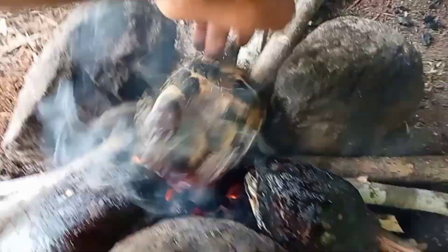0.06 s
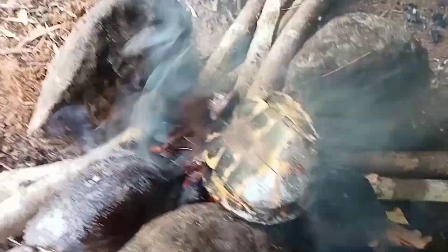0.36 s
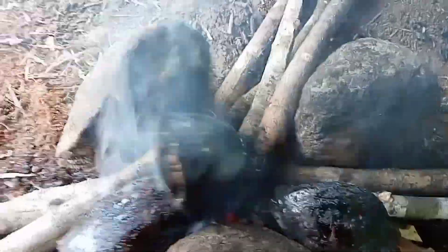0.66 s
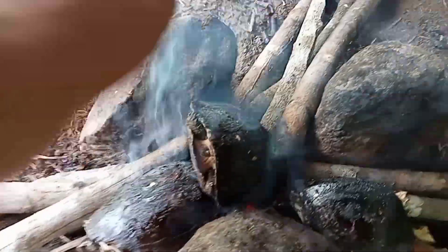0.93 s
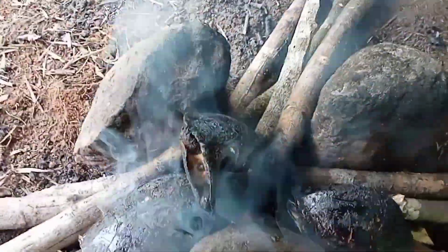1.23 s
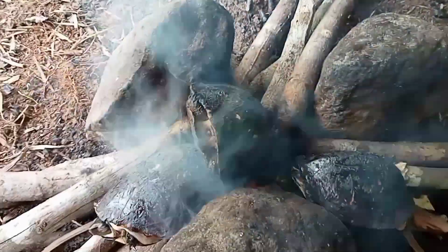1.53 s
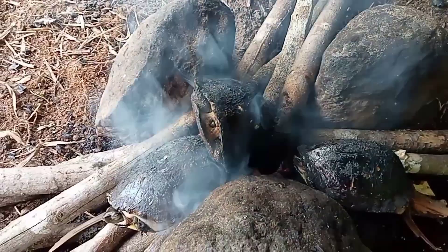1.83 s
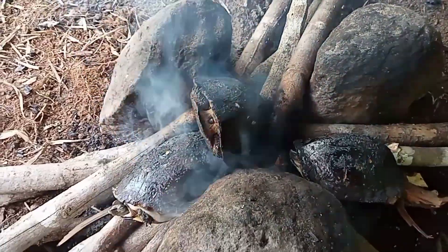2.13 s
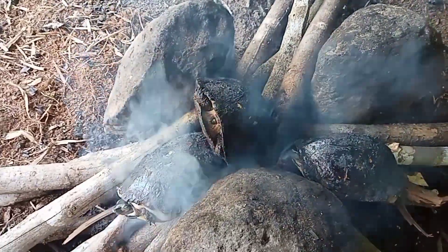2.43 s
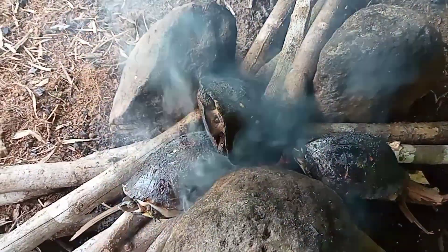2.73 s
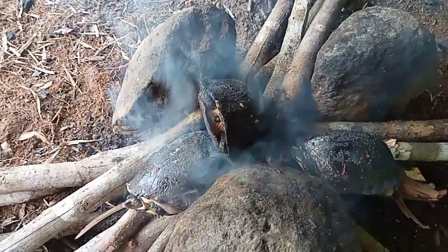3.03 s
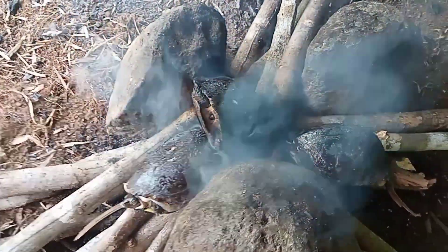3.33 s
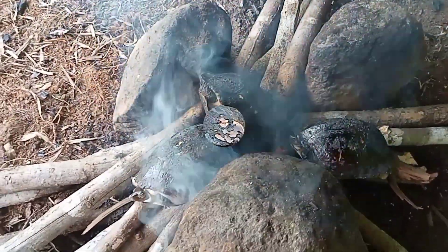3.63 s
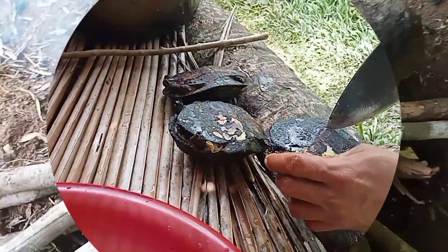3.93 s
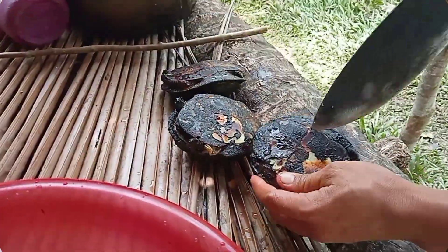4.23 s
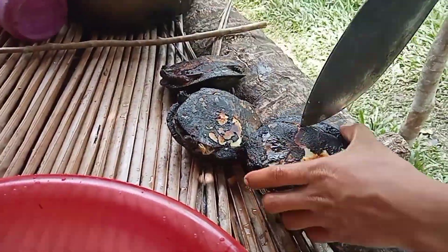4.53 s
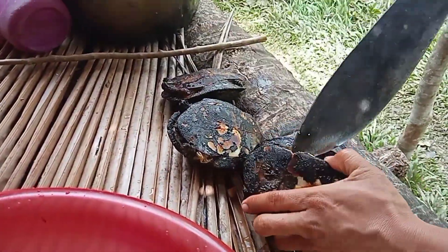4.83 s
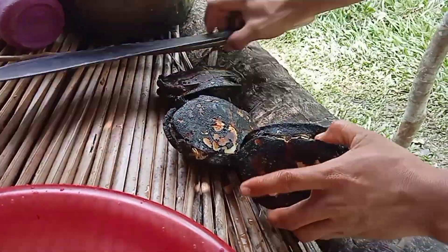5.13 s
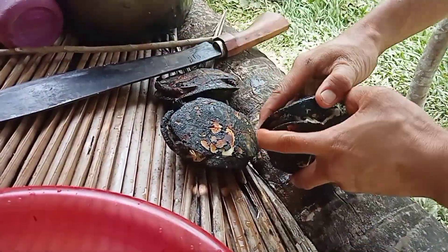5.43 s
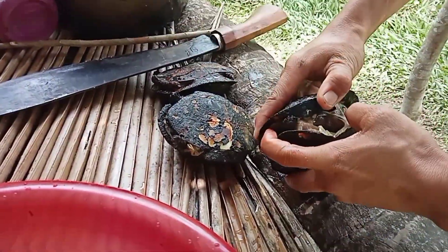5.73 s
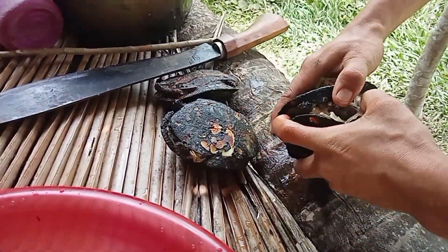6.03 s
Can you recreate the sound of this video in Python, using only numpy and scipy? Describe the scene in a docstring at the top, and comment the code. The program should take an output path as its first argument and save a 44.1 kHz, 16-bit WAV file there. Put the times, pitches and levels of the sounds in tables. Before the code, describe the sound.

A shell scrapes among hearth stones and drops into the embers with a loud knock. Juice sizzles while the wood fire crackles and pops. The fire fades away, and a long knife pries at the charred shell with scrapes and small knocks, then clunks down on a slatted bench. Hands crack the shell and tear it open with a crunch. The microphone is close, in a quiet yard.

```python
"""Outdoors in a quiet yard, one microphone close to a wood fire. A shell is turned over among the
hearth stones and dropped into the embers, where its juice sizzles. Pockets of steam pop and whistle
in the wood, and a thin, insect-like buzz comes and goes. From 3.5 s the fire fades out; just as close,
on a slatted bench, a long knife pries at the charred shell and is laid down with a clunk.
Last, two hands crack the shell and tear it open."""
import sys
import numpy as np
from scipy import signal
from scipy.fft import rfft, irfft
from scipy.io import wavfile
from scipy.ndimage import uniform_filter1d

SR = 44100
rng = np.random.default_rng(int(sys.argv[2]) if len(sys.argv) > 2 else 0)


def dump_mix(stems):
    """Bounce the given channels to the path in sys.argv[1] as a 16-bit WAV at rate SR."""
    frames = np.atleast_2d(stems).T  # one column per channel
    limited = np.clip(frames, -1, 1)  # hard clip at full scale
    pcm = np.round(limited * 32767).astype(np.int16)
    wavfile.write(sys.argv[1], SR, pcm)


N = 276110
TAPS = 4096
BINS = np.fft.rfftfreq(TAPS, 1 / SR)
BENCH_FROM_S = 3.9  # the shell is at the hearth before this, on the bench after

# Tone curves, all alike. Each row: frequency in Hz, relative level in dB.
YARD_AIR = [(18, -27.5), (30, -9), (90, 2.5), (259, -2), (328, -5.5), (616, -26.5), (702, -30), (780, 1.5),
            (937, -6.5), (1100, -30), (2230, -41), (3310, -21.5), (5040, -78), (8080, -34), (16000, -62)]  # open air all around
RUMBLE_COLOUR = [(25, -28), (45, -14), (70, 0.5), (120, -3), (250, -5.5), (600, -19), (2000, -57)]  # air moving at the microphone
FLAME_COLOUR = [(24, -36.5), (40, -25), (81, -0.5), (140, 0), (294, -5), (530, 1), (739, -6), (815, -5.5),
                (3270, -3.5), (4300, -11), (5590, -68), (9460, -120)]  # the steady rush of the flames
SIZZLE_COLOUR = [(2000, -14.5), (3600, -2), (4400, -18), (5100, -14), (6200, -10.5), (7100, 0.5), (7700, 1),
                 (8600, -12), (10000, -7.5), (13000, -11), (15000, -3), (16000, -10.5)]  # juice on the embers
POP_COLOUR = [(30, -42), (100, -7), (250, -3.5), (550, 0.5), (830, -1.5), (1050, -5.5), (1400, -1.5),
              (2000, -4), (3700, 3), (4400, -4.5), (5100, -12), (6200, 1), (7100, 9), (8400, -4.5),
              (10500, -11.5), (15000, -4)]  # the resonances a pop sounds through
SHELL_AT_HEARTH = [(25, -42.5), (45, -26.5), (75, -11), (130, -5), (260, -1), (340, -2), (850, -4.5),
                   (1200, -6.5), (1650, -1.5), (2400, -1.5), (4000, -3.5), (4900, -11.5), (8400, -3),
                   (10500, -3.5), (15000, -3.5)]  # the shell among the stones
SHELL_ON_BENCH = [(25, -41), (45, -16), (70, -7), (160, -2.5), (270, 0), (380, -3), (800, .5), (1200, -4),
                  (2200, 0), (3700, -1), (4700, -10), (6000, -12.5), (9000, -6.5), (11000, -19),
                  (15000, -13.5)]  # the shell on the slats

# Arms sweep air past the microphone. Each row: start and end in seconds, level in dB.
ARM_SWEEPS = [(-.2, .36, -54.5), (3.75, 6.5, -68.5)]
# Spells of faint buzzing. Each row: start and end in seconds, level in dB.
BUZZES = [(1.0, 2.68, -67.5), (3.2, 3.883, -62.5)]
# Juice spills on the embers. Each row: start in seconds, level in dB, decay in seconds.
SPILLS = [(.14, -42.5, 0.082), (.43, -32, .012), (.535, -39, 0.127)]
# Steam jets. Each row: start and end in seconds, first and last pitch in Hz, level swelled to in dB.
WHISTLES = [(2.17, 2.40, 2610, 1476, -50), (3.394, 3.47, 6200, 7150, -47)]
# Steam bursts in the wood. Each row: start in seconds, strength in dB, pitch in Hz,
# decay of the splinters in seconds, share of the first snap from 0 to 1.
POPS = [(0.1212, -3.5, 2800, 0.0064, 0.85), (.757, -1, 5476, 0.00444, .54),
        (1.1655, 12.5, 600, 0.0073, 0.77), (1.186, -5, 1580, .012, 0.52),
        (1.2773, 15.5, 268.5, 0.0081, 0.62), (1.2965, -6, 870, 0.0063, .5),
        (1.4595, -13.5, 10800, 0.0068, 0.28), (1.509, -6, 9000, 0.031, 0.12),
        (1.7716, -9.5, 14000, 0.0062, 0.81), (1.839, -1.5, 1690, 0.0048, 0.79),
        (1.8816, -8, 9000, 0.0106, 0.85), (2.0157, -2.5, 2190, 0.0106, 0.6), (2.0645, 4, 331, 0.0084, 0.09),
        (2.1274, -9.5, 4200, 0.0113, 0.19), (2.344, -14.5, 12000, 0.0077, 0.25),
        (2.415, 2, 3050, 0.0039, 0.9), (2.552, 10.5, 857, 0.006, 0.45), (2.811, -10, 14000, 0.0136, 0.79),
        (2.891, -11.5, 10700, 0.011, 0.93), (3.1102, -10.5, 914, 0.0045, 0.27),
        (3.1586, -3.5, 1289, 0.0083, 0.22), (3.2349, -2, 3200, 0.006, .8),
        (3.4602, -11, 12000, 0.0051, 0.37), (3.573, -7.5, 7000, 0.00296, 0.31),
        (3.6029, 17, 758, 0.00447, 0.27), (3.6518, -17.5, 6000, 0.0073, .4),
        (3.844, -11.5, 1600, 0.015, 0.37), (3.8596, -8, 1350, 0.0048, 0.26),
        (4.0938, -16, 12000, .003, 0.7)]
# Soft bumps of handling. Each row: start and end in seconds, pitch in Hz, level in dB.
BUMPS = [(3.719, 3.768, 85.6, -45), (3.851, 3.915, 74, -52.5), (4.258, 4.318, 63, -45.5),
         (4.348, 4.42, 63.2, -42.5)]

# Ringing modes. Each row: frequency in Hz, level in dB, time to fall 60 dB in seconds.
BLADE_MODES = [(5003, -6.5, 0.176), (6200, -7, .22), (7580, -7, .07), (8760, -7.5, 0.109)]  # the long knife
BENCH_MODES = [(77.6, -2.5, 0.13), (247.6, -18, 0.0676), (530, 5, 0.0007), (983.7, -4, 0.0526),
               (1325, -5.5, 0.0127)]  # the bench under it
RIM_MODES = [(2787, -2.5, 0.036), (3040, -5, 0.026), (3153, 2.5, 0.0327), (3758, -6, 0.016),
             (3793, 4.5, 0.0366), (4100, -4.5, 0.037)]  # the hard rim of the shell
# What sets them ringing. Each row: start in seconds, level in dB, extra damping in dB per second.
BLADE_TOUCHES = [(4.66, -55.5, 390), (4.709, -62, 300), (5.141, -56.5, 5)]  # heavily damped while the blade is stuck in the shell
BENCH_BLOWS = [(5.149, -26.5, 30), (5.1697, -22.5, 6)]  # the knife is laid down
# The rim rasps on a stone. One row: start and end in seconds, level in dB.
RIM_RASP = (.224, 0.256, -30.5)
# Resonances of the hollow shell. Each row: frequency in Hz, width in Hz, height in dB.
SHELL_MODES = [(173.7, 110, 4.5), (405, 93, 4), (563, 82, 5), (680, 28, 0.5), (808.4, 71, 6.5),
               (1595, 40, 1.5), (1990, 61, 3.5), (2996, 65, 9.5), (3290, 70, 4.5), (4037, 150, 5.5),
               (7160, 1500, 14.5)]
# Shell, charcoal and blade scrape and crunch. Each row: start and end in seconds, strength in dB,
# hardness as a corner in Hz, weight in the bass in dB.
CRUNCHES = [(.149, .197, 3.5, 16000, 3), (.221, 0.272, 4.5, 16100, -11.5), (.245, .327, -3.5, 16000, -3),
            (.432, 0.463, -4, 16000, 12.5), (0.473, 0.524, -3.5, 16230, 4.5), (3.672, 3.759, -16, 3000, 24),
            (3.91, 3.941, -9.5, 4800, 4.5), (3.988, 4.11, 3, 1100, -5), (4.255, 4.338, -13, 1100, 24),
            (4.556, 4.593, 0, 1850, 14.5), (4.595, 4.647, 8.5, 738, 1.5), (4.792, 5.047, -2, 1460, 3.5),
            (5.128, 5.175, 5, 800, 23.5), (5.18, 5.249, -16, 900, 30), (6.025, 6.175, 1.5, 2860, 11),
            (6.131, 6.181, 16, 2102, -3.5)]
# Blows of shell and knife. Each row: start in seconds, strength in dB, hardness as a corner in Hz,
# weight in the bass in dB, decay of the rattle in seconds, share of the first contact from 0 to 1.
KNOCKS = [(.0289, 8.5, 3065, 21, .0067, 0.38), (.146, 2, 16000, 23, 0.0061, 0.34),
          (.1906, 0, 7670, 19, 0.00344, 0.16), (.303, -6.5, 6290, 16, 0.0035, 0.47),
          (.461, 6, 5020, 15, 0.0078, 0.06), (.507, 5, 5750, 15.5, 0.0054, 0.42),
          (.5371, 39.5, 797, -11, 0.00317, 0.73), (.578, -22.5, 5000, 38, .011, 0.13),
          (.626, 11.5, 1204, -17.5, 0.0146, 0.63), (1.347, -18, 6390, 32.5, 0.0119, 0.37),
          (3.728, 12, 480, -6, 0.0055, 0.26), (4.354, -2, 1765, -1, 0.0055, 0.05),
          (4.39, -10.5, 3000, 2.5, 0.00294, 0.53), (4.446, 3, 399, 4.5, 0.0071, 0.18),
          (4.657, 1, 2580, 6, 0.00848, 0.18), (4.7113, 13, 652, -1, 0.0041, 0.29),
          (4.78, -3.5, 1700, -4, 0.0079, .2), (4.952, -16.5, 13020, 0.5, 0.00252, 0.34),
          (5.129, -26, 14120, 0, 0.0031, .6), (5.1476, 2, 1004, 28.5, 0.0175, 0.06),
          (5.1696, 5, 1630, 31.5, 0.00606, 0.34), (5.1772, 23.5, 400, 8.5, 0.0052, 0.44),
          (5.379, -10, 1390, -7.5, 0.0113, .3), (5.448, -8, 2205, -0.5, 0.0104, 0.23),
          (5.6178, 32, 329.5, 0, 0.0024, .95), (5.631, 14.5, 2276, 9, 0.0021, 0.56),
          (5.637, 1.5, 3200, -11, 0.004, .3), (5.66, 8, 877, -18, 0.00427, 0.49),
          (5.896, -4, 1364, 4.5, 0.0161, 0.21), (5.989, -14, 890, 21, 0.0075, 0.29)]


def amp(db):
    """Decibels to gain."""
    return 10 ** (np.asarray(db) / 20)


def unit_rms(x):
    """Scales to rms 1."""
    return x / np.sqrt(np.mean(x ** 2) + 1e-20)


def unit_energy(x):
    """Scales to energy 1."""
    return x / (np.linalg.norm(x) + 1e-12)


def curve_db(points):
    """A tone curve at BINS, joined up along a log-frequency axis."""
    hz, db = np.transpose(points)
    return np.interp(np.log(BINS + 1), np.log(hz + 1), db)


def add(mix, start, sound):
    """Mixes a sound in at a start in seconds."""
    part = mix[round(start * SR):][:len(sound)]
    part += sound[:len(part)]


def colour(x, gain_db):
    """Causal filter with the given gain at BINS: attacks stay sharp, resonances ring after them."""
    log_gain = np.log(amp(np.maximum(np.r_[gain_db, gain_db[-2:0:-1]], -100)))
    minimum_phase = np.exp(np.conj(signal.hilbert(log_gain)))
    return signal.oaconvolve(x, irfft(minimum_phase[:len(BINS)]))


def bed(drive, curve):
    """A lasting sound of rms 1, coloured by a tone curve."""
    return unit_rms(colour(drive, curve_db(curve))[:N])


def through_body(force, gain_db, bass_hz=900):
    """A burst of force heard through a body, which sets the broad spectrum and, in the bass, the detail."""
    power = abs(rfft(force, 4 * TAPS)[::4]) ** 2
    broad = uniform_filter1d(uniform_filter1d(power, size=35), size=35)
    bass = 1 / (1 + (BINS / bass_hz) ** 4)
    force_power = bass * uniform_filter1d(power, size=11) + (1 - bass) * broad
    return colour(force, gain_db - 10 * np.log10(force_power + 1e-9))


def grains(count, per_s, spread_db):
    """Random clicks of uneven size."""
    chance, size, sign = rng.random(count), rng.exponential(1, count), rng.choice([-1., 1.], count)
    return (chance < per_s / SR) * sign * amp(spread_db * np.minimum(size, 4.5))


def drift(per_s, count=N):
    """A random wander, roughly between -1 and 1."""
    knots = rng.standard_normal(count // 25 + 2)
    return np.interp(np.arange(count) / SR * per_s, np.arange(len(knots)), knots)


def spells(rows, edge_s):
    """Gain of something that comes and goes: each spell rises, holds and falls."""
    t = np.arange(N) / SR
    return sum(amp(db) * np.clip(np.minimum(t - start, end - t) / edge_s, 0, 1)
               for start, end, db in rows)


def fracture(snap_share, decay_s, echo, echo_s, edge_s=0.0004, push_s=0.00012):
    """One brief snap, its echo off the nearest surface, and a dying scatter of smaller clicks."""
    t = np.arange(TAPS) / SR
    scatter = unit_energy(grains(TAPS, per_s=7400, spread_db=3) * np.exp(-t / decay_s) * (t > .001))
    scatter[int(echo_s * rng.uniform(.85, 1.15) * SR)] += echo
    # the snap is one rounded push with a ragged treble edge that takes a moment to build
    edge = unit_energy(np.diff(rng.standard_normal(TAPS) * t * np.exp(-t / edge_s), prepend=0))
    push = np.exp(-t / push_s)
    snap = push / push.sum() + 1.2 * edge
    return np.sqrt(snap_share) * snap + np.sqrt(1 - snap_share) * unit_energy(scatter)


def ticking(per_s, spread_db, **shape):
    """One small fracture, repeated at random times and strengths."""
    return signal.fftconvolve(grains(N, per_s, spread_db), fracture(**shape))[:N]


def dying_modes(modes, t):
    """Sines that start together and each die at their own rate."""
    return sum(amp(db - 60 * t / t60) * np.sin(2 * np.pi * hz * t) for hz, db, t60 in modes)


def yard(air_db=-63.5, leaves_db=-82, rumble_db=-68, gust_db=3):
    """Faint open air and leaf hiss, over a lumpy rumble that rises as arms pass the microphone."""
    rumble = bed(rng.standard_normal(N) * amp(gust_db * drift(per_s=21)), RUMBLE_COLOUR)
    air = amp(air_db) * bed(rng.standard_normal(N), YARD_AIR)
    leaves = amp(leaves_db) * rng.standard_normal(N)
    return air + leaves + (amp(rumble_db) + spells(ARM_SWEEPS, edge_s=0.2)) * rumble


def buzz(pitch_hz=11230, pulse_hz=82, half_width_hz=700):
    """Likely an insect in the background: rapid pulses of a narrow, very high band of noise."""
    pulses = np.sin(np.pi * np.cumsum(pulse_hz * (1 + .05 * drift(per_s=10))) / SR) ** 2
    lowpass = signal.butter(2, half_width_hz, fs=SR)
    fuzz = signal.lfilter(*lowpass, rng.standard_normal(N) + 1j * rng.standard_normal(N))
    band = (fuzz * np.exp(2j * np.pi * pitch_hz * np.arange(N) / SR)).real
    return spells(BUZZES, edge_s=0.167) * unit_rms(band * pulses)


def hearth_share(from_s=3.542, to_s=4.526):
    """How much of the fire is heard: 1 at the hearth, fading to 0 as the scene changes to the bench."""
    return np.clip((to_s - np.arange(N) / SR) / (to_s - from_s), 0, 1) ** 1.718


def fire(flame_db=-55.5, juice_db=-48, flicker_db=4.5, spill_rise_s=0.0128):
    """Flames rush close by; juice hisses, crackles and spits on the embers, flaring at each spill."""
    t = np.arange(N) / SR
    juice = amp(juice_db + drift(per_s=6))
    for start, db, decay_s in SPILLS:
        rise = np.clip((t - start) / spill_rise_s, 0, 1)
        fall = np.exp(-np.maximum(t - start - spill_rise_s, 0) / decay_s)
        juice += amp(db) * rise * fall
    flicker = amp(flicker_db * drift(per_s=28))
    flame_gain = amp(flame_db + 0.93 * drift(per_s=7))
    flames = flame_gain * bed(rng.standard_normal(N) * np.sqrt(flicker), FLAME_COLOUR)
    hiss = amp(-6.5) * bed(grains(N, per_s=6200, spread_db=-1) * flicker, SIZZLE_COLOUR)
    # each spot in the embers spits with its own splinters
    ticks = sum(ticking(per_s=27, spread_db=4, snap_share=0.61, decay_s=0.012, echo=0.3, echo_s=0.0024)
                for spot in range(3))
    crackle = amp(-5.5) * bed(ticks, POP_COLOUR)
    snaps = ticking(per_s=27, spread_db=2.5, snap_share=0.6, decay_s=0.006, echo=0.3, echo_s=0.0026)
    droplets = amp(-10) * bed(snaps, SIZZLE_COLOUR)
    return hearth_share() * (flames + juice * (hiss + crackle + droplets))


def steam_whistles(swell_db=11.5):
    """Thin, unsteady jets of steam leave the wood, gliding and growing until they give out."""
    out = np.zeros(N)
    for start, end, first_hz, last_hz, db in WHISTLES:
        count = int((end - start) * SR)
        along = np.linspace(0, 1, count)
        hz = first_hz + (last_hz - first_hz) * along + 100 * drift(per_s=600, count=count)
        waver_db = 3.5 * drift(per_s=200, count=count)
        gain = amp(db + swell_db * (along - 1) + waver_db) * signal.windows.tukey(count, .25)
        add(out, start, np.sqrt(2) * gain * np.sin(2 * np.pi * np.cumsum(hz) / SR))
    return out


def steam_pops(sharpness=0.49):
    """Pockets of steam burst in the wood, between the hearth stones: big ones low, small ones high."""
    out = np.zeros(N)
    for start, db, hz, decay_s, snap_share in POPS:
        pocket_db = -10 * np.log10(1 + sharpness * (BINS / hz - hz / (BINS + 1)) ** 2)
        force = fracture(snap_share, decay_s, echo=0.338, echo_s=0.0028)
        add(out, start, through_body(force, db + pocket_db + curve_db(POP_COLOUR)))
    return out


def contact_db(hard_hz, weight_db, weight_hz=396.5):
    """Spectrum of a force: hard contacts reach high, heavy ones add bass."""
    return weight_db / (1 + (BINS / weight_hz) ** 2) - 20 * np.log10(1 + (BINS / hard_hz) ** 2)


def shell_db(at_s, held_share=0.087):
    """Response of the hollow shell at a given time; on the bench a hand damps its resonances."""
    peaks_db = sum(db / (1 + (2 * (BINS - hz) / width) ** 2) for hz, width, db in SHELL_MODES)
    if at_s < BENCH_FROM_S:
        return curve_db(SHELL_AT_HEARTH) + peaks_db
    return curve_db(SHELL_ON_BENCH) + held_share * peaks_db


def flake_db(height_db=8, relative_width=0.062):
    """Each flake of crust rings at four pitches of its own."""
    pitches = np.geomspace(600, 3600, 4) * np.exp(rng.uniform(-.3, .3, 4))
    peaks = sum(1 / (1 + (2 * (BINS / hz - 1) / relative_width) ** 2) for hz in pitches)
    return height_db * (peaks - .25)


def fingers(level_db=-61.5, grit_db=-6, effort_db=2):
    """As the fire fades, fingers rub the gritty crust, pressing now more, now less."""
    rub = grains(N, per_s=1600, spread_db=1.5) * amp(2 * drift(per_s=39))
    grit = ticking(per_s=45, spread_db=1.5, snap_share=0.3, decay_s=0.0101, echo=0.5, echo_s=0.0041)
    held_db = shell_db(BENCH_FROM_S)
    rub = unit_rms(colour(rub, held_db + contact_db(hard_hz=1200, weight_db=1))[:N])
    grit = unit_rms(colour(grit, held_db + contact_db(hard_hz=3800, weight_db=-4))[:N])
    pressure = amp(level_db + effort_db * drift(per_s=7))
    return (1 - hearth_share()) * pressure * (rub + amp(grit_db) * grit)


def handling_bumps():
    """Dull, low swings as something heavy is nudged or pressed."""
    out = np.zeros(N)
    for start, end, hz, db in BUMPS:
        t = np.arange(0, end - start, 1 / SR)
        add(out, start, amp(db) * np.sqrt(2) * np.hanning(len(t)) * np.sin(2 * np.pi * hz * t))
    return out


def ringing(modes, blows):
    """Blade or bench rings at each blow, damped by whatever touches it."""
    out, t = np.zeros(N), np.arange(SR // 3) / SR
    tone = dying_modes(modes, t)
    for start, db, damping in blows:
        add(out, start, amp(db - damping * t) * tone)
    return out


def rim_rasp():
    """The shell turns on a stone, and a quick run of slips sets its hard rim ringing."""
    start, end, db = RIM_RASP
    out, t = np.zeros(N), np.arange(0, end - start, 1 / SR)
    slips = grains(len(t), per_s=2000, spread_db=1) * np.hanning(len(t))
    add(out, start, amp(db) * unit_rms(signal.fftconvolve(slips, dying_modes(RIM_MODES, t))))
    return out


def crunches(flakes=3, clump_db=3):
    """Brittle char gives way in clumps of tiny fractures, in a run that swells and dies."""
    out = np.zeros(N)
    for start, end, db, hard_hz, weight_db in CRUNCHES:
        count = int((end - start) * SR)
        swell = signal.windows.tukey(count, .85)
        body_db = db + contact_db(hard_hz, weight_db) + shell_db(start)
        for _ in range(flakes):
            clicks = grains(count, per_s=2000, spread_db=3.5)
            clumps = amp(clump_db * drift(per_s=110, count=count))
            force = unit_energy(clicks * swell * clumps)
            add(out, start, through_body(force, body_db + flake_db()) / np.sqrt(flakes))
    return out


def knocks():
    """Right at the microphone, shell and knife strike and rattle on stone, wood and each other."""
    out = np.zeros(N)
    for start, db, hard_hz, weight_db, decay_s, snap_share in KNOCKS:
        body_db = db + contact_db(hard_hz, weight_db) + shell_db(start)
        if start > BENCH_FROM_S:  # the burnt crust is loose by now
            body_db += flake_db()
        force = fracture(snap_share, decay_s, echo=0.13, echo_s=0.0039)
        add(out, start, through_body(force, body_db))
    return out


def with_reflections(x, wet_db=-23, t60=0.11):
    """The ground and things nearby send a short, weak tail back to the microphone."""
    t = np.arange(SR // 2) / SR
    tail = grains(len(t), per_s=1100, spread_db=6) * amp(-60 * t / t60) * (t > .008)
    return x + amp(wet_db) * signal.fftconvolve(x, unit_energy(tail))[:N]


def scene():
    """Hearth, then bench, close to one microphone, with the yard behind."""
    near = steam_pops() + knocks() + crunches() + rim_rasp() + handling_bumps()
    near += ringing(BLADE_MODES, BLADE_TOUCHES) + ringing(BENCH_MODES, BENCH_BLOWS)
    return (with_reflections(near) + fire() + steam_whistles() + buzz() + fingers() + yard())[None]


def record(dry):
    """The loudest blow overloads the microphone input; the treble ends at 15.75 kHz."""
    lowpass = signal.firwin(401, 15750, window=("kaiser", 7), fs=SR)
    return signal.oaconvolve(np.clip(dry, -1, 1), lowpass[None], "same")


dry = scene()
out = record(dry)
dump_mix(out)
```